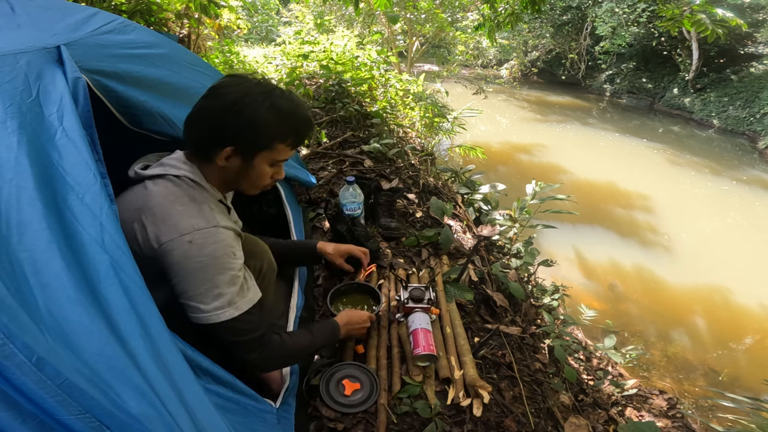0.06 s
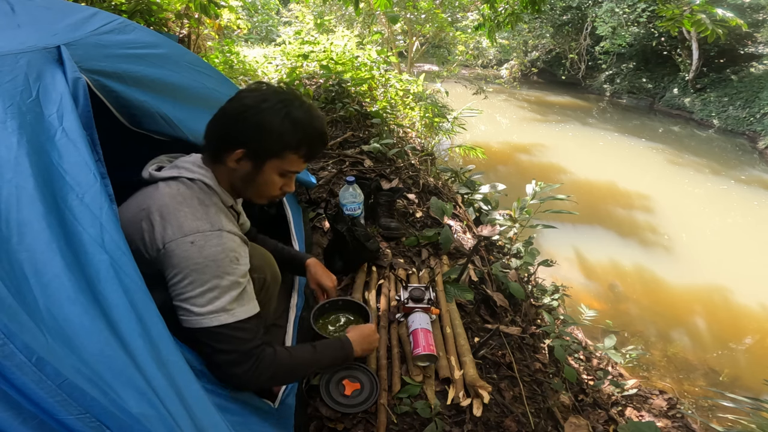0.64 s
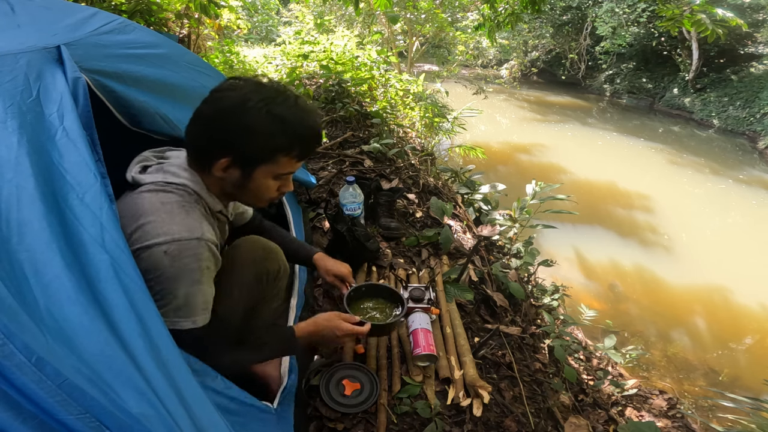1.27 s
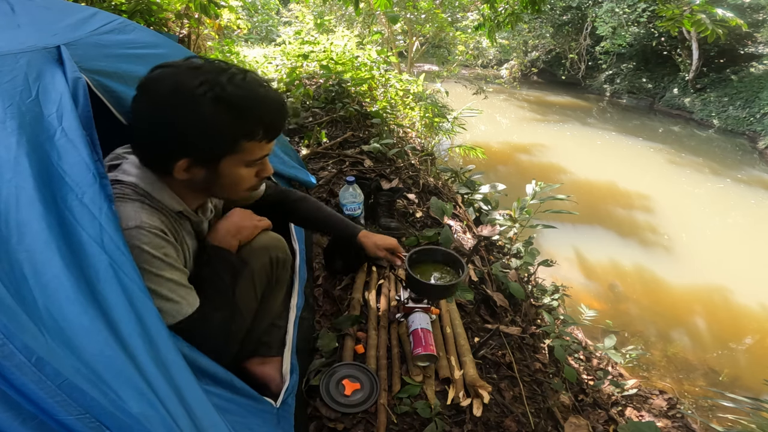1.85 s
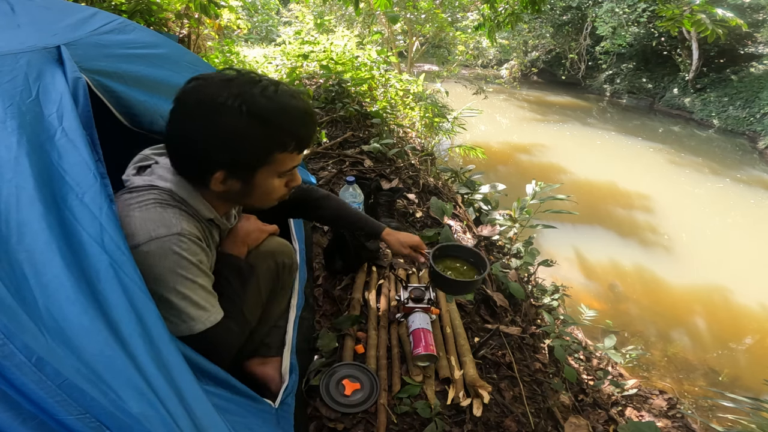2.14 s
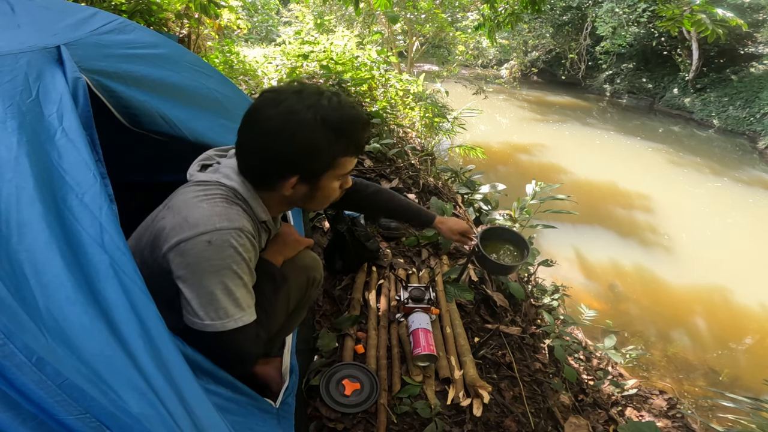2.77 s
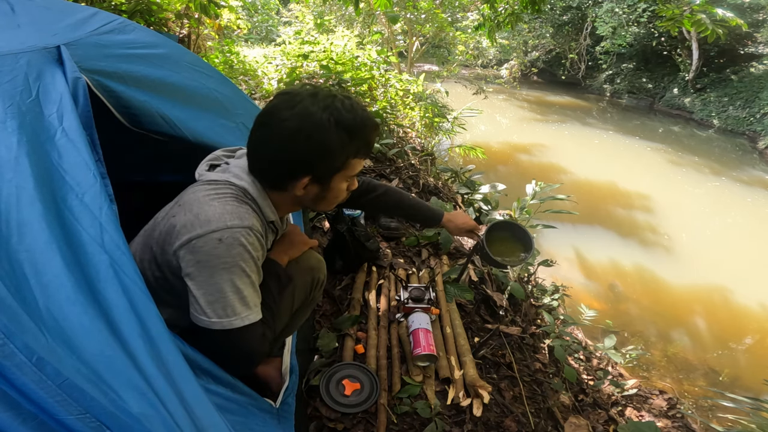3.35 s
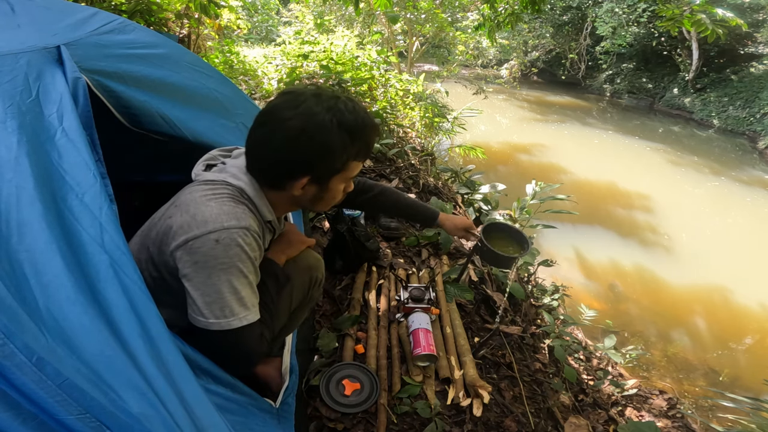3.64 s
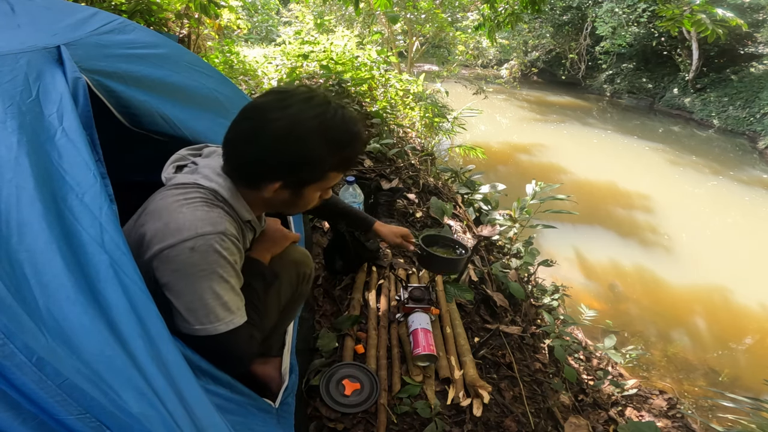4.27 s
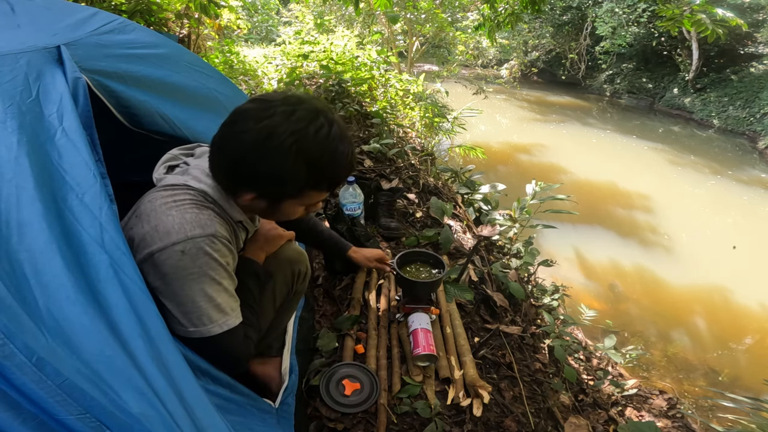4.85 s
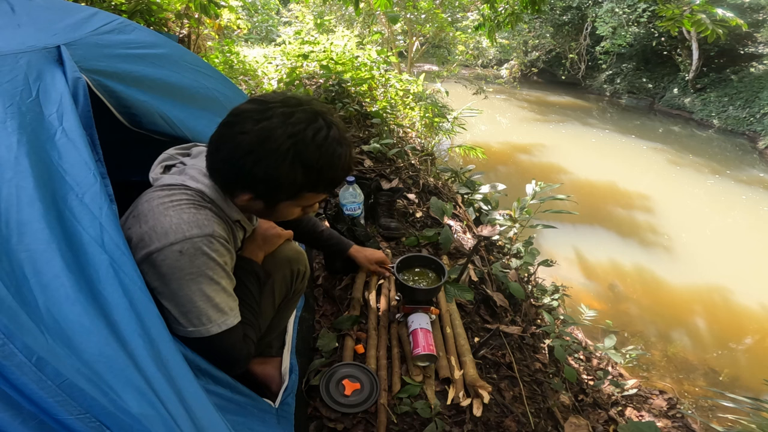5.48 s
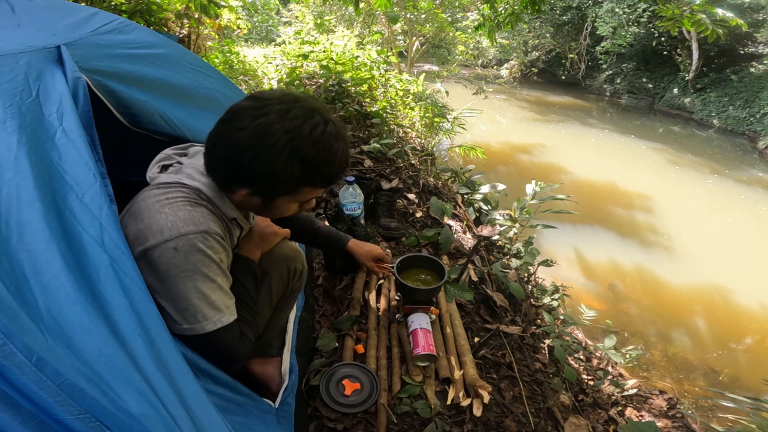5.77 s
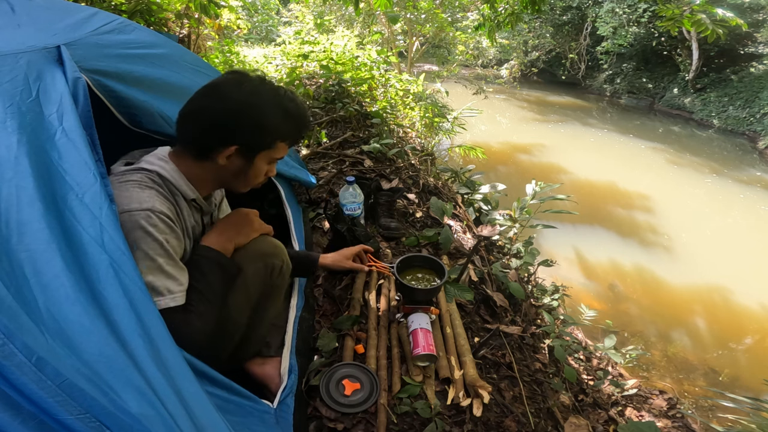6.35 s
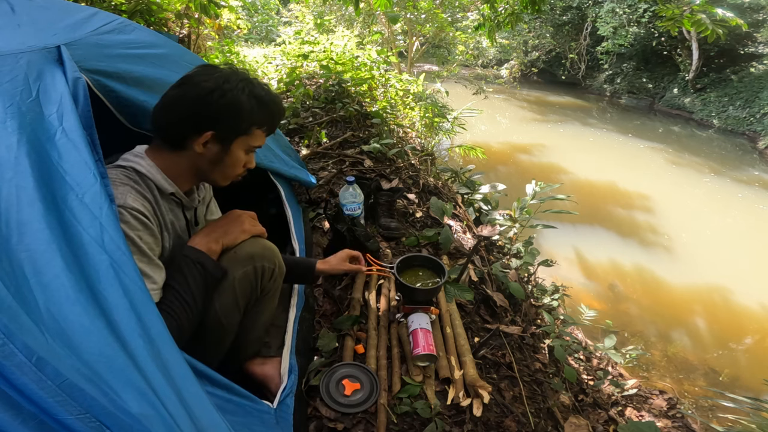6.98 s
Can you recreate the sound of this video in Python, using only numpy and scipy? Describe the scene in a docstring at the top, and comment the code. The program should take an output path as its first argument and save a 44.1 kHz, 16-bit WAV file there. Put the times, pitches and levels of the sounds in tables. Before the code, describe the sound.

Insects drone high and steady by a quiet forest river while a small pot knocks, spills a little water and is set down.

```python
"""On a forest river bank, cicadas drone by tymbal clicks, with trilling crickets and very high katydids. A
centred chorus crossfades into a wide one that leans to the left; the river murmurs underneath. A cook lifts a
small pot, tips water onto the leaves and sets the pot on a camp stove: each contact excites the pot's damped
modes, and each drop makes a short ping. Sleeves brush, and the handling shakes the microphone's stand into a
low rumble."""
import sys
import numpy as np
from scipy import signal
from scipy.fft import rfft, irfft, next_fast_len
from scipy.io import wavfile
from scipy.ndimage import map_coordinates

SR = 44100
rng = np.random.default_rng(int(sys.argv[2]) if len(sys.argv) > 2 else 0)


def log_audio(samples):
    """Write samples as a 16-bit WAV file to the path given in sys.argv[1]."""
    # one column per channel
    frames = np.atleast_2d(samples).T
    # limit to full scale, then quantise
    limited = np.clip(frames, -1, 1)
    pcm = np.round(limited * 32767).astype(np.int16)
    wavfile.write(sys.argv[1], SR, pcm)


N = 309582
TIME = np.arange(N) / SR  # [s]


def amp(db):
    """Decibels to amplitude ratio."""
    return 10 ** (np.asarray(db) / 20)

def unit(x):
    """Normalisation to rms 1."""
    return x / np.sqrt(np.mean(x ** 2) + 1e-30)

def noise():
    """Two uncorrelated white noises."""
    return rng.standard_normal((2, N))

def wobble(rate):
    """Random modulation: a smooth curve with rate knots a second."""
    return map_coordinates(rng.standard_normal(int(N * rate / SR) + 4), [TIME * rate])

def ramp(start, length):
    """Linear rise from 0 to 1."""
    return np.clip((TIME - start) / max(length, 1e-3), 0, 1)

def stroke(start, length, attack, release):
    """Trapezoidal envelope: attack, hold until the length is up, release."""
    return ramp(start, attack) * (1 - ramp(start + length, release))

def filtered(x, response):
    """Linear filtering: the spectrum of x times a frequency response."""
    size = next_fast_len(N + SR // 2)
    return irfft(rfft(x, size) * response(np.fft.rfftfreq(size, 1 / SR)), size)[..., :N]

def coloured(x, points):
    """Spectral shaping by (frequency [Hz], level [dB]) points, at rms 1."""
    hz, db = np.transpose(points)
    return unit(filtered(x, lambda f: amp(np.interp(np.log(f + 1), np.log(hz), db, -120, -120))))

def resonant(x, modes):
    """Steep-skirted resonances (frequency [Hz], bandwidth [Hz], level [dB]) driven by x, at rms 1."""
    def response(f):
        return sum(amp(db) * abs(f * width / (hz * hz - f * f + 1j * f * width)) ** 2
                   for hz, width, db in modes)
    return unit(filtered(x, response))

def placed(pair, left_db, width, lag=0):
    """Stereo image of a (shared, diffuse) pair by level difference; lag adds a phase difference."""
    shared, diffuse = pair
    left, right = amp(left_db / 2), amp(-left_db / 2)
    side = width * diffuse + lag * filtered(shared, lambda hz: -1j)
    norm = np.hypot(left + right, np.hypot(width, lag) * (left - right))
    return 2 * np.array([left * (shared + side), right * (shared - side)]) / norm

def forest(x, t60):
    """Multiple scattering among trunks and leaves: two uncorrelated, exponentially decaying tails."""
    t = np.arange(SR // 2) / SR
    tail = rng.standard_normal((2, len(t))) * amp(-60 * t / t60)
    return signal.fftconvolve(x[None], tail / np.linalg.norm(tail[0]), axes=1)[:, :N]

def nearby(x, left_db, wet_db):
    """Direct sound of a close source plus brief scattering off the bank."""
    return placed([x, 0 * x], left_db, width=0, lag=0.7) + amp(wet_db) * forest(x, t60=0.19)

def ambiences():
    """Crossfade gains: a centred ambience dies out while a wide one swells."""
    centred = (1 - ramp(start=0.69, length=0.87)) ** 2
    wide = 1 - np.exp(-np.maximum(TIME - 0.39, 0) / 2.8)
    return centred, wide

def presence(centred_db, wide_db):
    """Incoherent addition: the gain of a source with its own level in each ambience."""
    centred, wide = ambiences()
    return np.hypot(amp(centred_db) * centred, amp(wide_db) * wide)

def openness():
    """The wide ambience's share of the power: 0 centred, 1 wide."""
    centred, wide = ambiences()
    return wide ** 2 / (wide ** 2 + centred ** 2 + 1e-12)


# spectrum of the flowing water: (frequency [Hz], relative spectral level [dB])
RIVER_SPECTRUM = [(120, 1), (220, 5), (300, 8), (420, 1.5), (600, 0), (800, -6), (1100, -1.5), (1500, -1.5),
                  (2200, -3.5), (4500, -0.5), (8000, -13.5), (11000, -9), (15000, -3)]

def river():
    """Amplitude-modulated noise of a slow river; its gurgle opens to the right, its hiss to the left."""
    wash = coloured(noise(), RIVER_SPECTRUM) * amp(0.64 * wobble(3.27) + 1.6 * wobble(18))
    gurgle = filtered(wash, lambda hz: 1 / (1 + (hz / 750) ** 4))
    hiss = filtered(wash, lambda hz: 1 - 1 / (1 + (hz / 3600) ** 6))
    middle = wash - gurgle - hiss
    spread = openness()
    return (presence(-66.5, -66) * placed(gurgle, -5.5 * spread, 0.45 * spread, lag=0.93 * spread)
            + presence(-66.5, -68.5) * placed(middle, 0.37 * spread, 0.69 * spread, lag=0.46 * spread)
            + presence(-68.5, -69.5) * placed(hiss, 7 * spread, 0.6 * spread, lag=0.69 * spread))

def chirrup(start, hz, db):
    """One faint falling chirp, made hoarse by random frequency modulation."""
    t = np.clip(TIME - start, -0.2, 0.2)
    pitch = hz * np.exp(-1.6 * t + 0.079 * wobble(900))
    return amp(db) * np.exp(-(t / 0.032) ** 2) * np.sin(2 * np.pi * np.cumsum(pitch) / SR)

def swarm(click_rate, jitter, swell_db, count):
    """Superposed impulse trains: each insect clicks at its own unsteady rate, along its own path."""
    pair = np.zeros((2, N))
    for _ in range(count):
        rate = click_rate * np.exp(0.2 * rng.standard_normal() + 0.02 * wobble(5) + jitter * wobble(150))
        clicks = np.diff(np.floor(np.cumsum(rate) / SR), prepend=0)
        pair += forest(clicks * amp(swell_db * wobble(12)), t60=0.083)
    return pair

def chirps(offset_s, sigma_s):
    """Periodic Gaussian envelopes that fade out as the steady buzz takes over."""
    first_s, period_s = 0.35, 0.402
    from_peak = (TIME - first_s - offset_s + period_s / 2) % period_s - period_s / 2
    return np.exp(-0.5 * (from_peak / sigma_s) ** 2) * np.interp(TIME, [3.8, 4.3], [1, 0])


# katydids that buzz on once started: (start [s], rise [s], frequency [Hz], bandwidth [Hz], level [dB])
STEADY_KATYDIDS = [(3.45, 0.15, 13700, 430, -70), (4.15, 0.42, 12880, 685, -66)]

def katydids():
    """Stridulation: wing files drive resonances at the top of hearing, in chirps or without a break."""
    def rasp(hz, width):
        return resonant(swarm(click_rate=300, jitter=0.25, swell_db=1.7, count=4), [(hz, width, 0)])
    far = amp(-75) * rasp(12600, 1100) + amp(-80.5) * rasp(14050, 700)
    buzz = sum(amp(db) * ramp(start, rise_s) * rasp(hz, width)
               for start, rise_s, hz, width, db in STEADY_KATYDIDS)
    # each chirp climbs to a bright top, then sinks back
    rise = amp(-76) * chirps(offset_s=-0.05, sigma_s=0.029) * rasp(13050, 950)
    top = amp(-69.5) * chirps(offset_s=0, sigma_s=0.061) * rasp(13600, 900)
    fall = amp(-70.5) * chirps(offset_s=0.13, sigma_s=0.054) * rasp(12800, 850)
    return placed(far + buzz + rise + fall, left_db=8.5, width=0.82) + placed(top, left_db=4.5, width=1)

def singers(rows):
    """Narrow-band noise: one wavering tone for each near insect."""
    return sum(amp(db) * resonant(noise(), [(hz, width, 0)]) for hz, width, db in rows)


# cricket tones: (frequency [Hz], bandwidth [Hz], relative level [dB])
CRICKET_TONES = [(5564, 81, -25), (5738, 61, -22), (5986, 89, -21.5)]

def crickets():
    """Sharp resonance: crickets trill in narrow bands between the two cicada choruses."""
    spread = openness()
    trill = placed(singers(CRICKET_TONES), 9 * spread, 0.76 * spread, lag=0.49 * spread)
    return presence(centred_db=-50, wide_db=-56) * trill


# song spectra of the two kinds of cicada: (frequency [Hz], relative spectral level [dB])
SHRILL_SPECTRUM = [(4000, -49), (5300, -28.5), (6100, -23), (6500, -15), (6750, -8.5), (6970, 0),
                   (7300, -2.5), (7800, -5.5), (8150, -12.5), (8450, -7), (8750, -16), (9100, -25),
                   (10500, -33), (12000, -71)]
LOW_SPECTRUM = [(2400, -28), (2850, -19.5), (3020, -9.5), (3160, -1), (3360, -2), (3580, -4), (3750, -11.5),
                (4200, -21.5), (5200, -27)]
# single cicadas that stand out: (frequency [Hz], bandwidth [Hz], level re their chorus [dB])
SHRILL_SOLOISTS = [(6920, 22, -19.5), (7300, 29, -20), (8000, 39, -16.5), (8170, 40, -18),
                   (8830, 57, -26.5)]
LOW_SOLOISTS = [(3332, 77, -8), (3579, 25, -8.5), (3920, 31, -20.5), (4150, 25, -26)]

def cicadas():
    """Cavity resonance: tymbal clicks ring in the hollow bodies of two kinds of cicada."""
    shrill = coloured(swarm(click_rate=420, jitter=0.15, swell_db=0.9, count=10), SHRILL_SPECTRUM)
    shrill += singers(SHRILL_SOLOISTS)
    low = coloured(swarm(click_rate=260, jitter=0.15, swell_db=2, count=7), LOW_SPECTRUM)
    low += singers(LOW_SOLOISTS)
    # the low chorus throbs at first, then steps up and keeps growing as nearer cicadas join
    spread, join_s = openness(), 3.5
    throb_db = 2.4 * (1 - spread) * chirps(offset_s=-0.03, sigma_s=0.079)
    growth_db = ramp(join_s, 0.061) * (5 + 0.46 * (TIME - join_s))
    low *= amp(throb_db + growth_db)
    return (presence(-52, -54) * placed(shrill, 15.4 * spread, 0.82 * spread)
            + presence(-66, -68.5) * placed(low, 4.5 * spread, 0.38 * spread, lag=0.75 * spread))

def swing(start, hz, swell_s):
    """Transient vibration of one mode: it builds up for swell_s, then dies away."""
    t = np.maximum(TIME - start, 0)
    return (t / swell_s * np.exp(1 - t / swell_s)) ** 2 * np.sin(2 * np.pi * hz * t)


# the stand's deep and upper resonances: (frequency [Hz], bandwidth [Hz], relative level [dB])
SWAY_MODES = [(23.8, 17, -3), (42, 9.8, 0), (58.5, 17, -12), (96.5, 9.3, -19.5), (117.1, 4.3, -10.5)]
BOOM_MODES = [(157, 37.6, 3), (198, 40, -4), (225, 72, -21.5)]
# the cook shifts his weight: (start [s], duration [s], sway level [dB], boom level [dB])
WEIGHT_SHIFTS = [(2.42, 0.43, -58, -73.5), (3.6, 0.444, -50, -71.5), (5.075, 0.657, -47.5, -60.5),
                 (5.8, 0.54, -59, -68)]
# soft bumps on the stand: (time [s], level [dB])
STAND_BUMPS = [(3.619, -43.5), (4.01, -46), (4.698, -33), (4.841, -42), (5.339, -36.5), (5.66, -43)]
# the stand's swing after a bump: (frequency [Hz], relative level [dB], rise [s])
SWING_MODES = [(42.2, 1, 0.044), (116.2, -14, 0.044)]
# dull thuds of the stick platform: (time [s], level [dB], frequency [Hz])
PLATFORM_THUDS = [(3.585, -55.5, 194), (4.346, -51.5, 230), (4.668, -45.5, 178), (5.01, -64.5, 300),
                  (5.596, -45, 165), (6.409, -61.5, 291)]

def stand():
    """Structure-borne vibration: movement shakes the stand, bumps swing it and the platform thuds."""
    sway_gain, boom_gain = presence(-52.5, -57.5), presence(-66, -66)
    for start, length, sway_db, boom_db in WEIGHT_SHIFTS:
        move = stroke(start, length, attack=0.042, release=0.083)
        sway_gain = np.hypot(sway_gain, amp(sway_db) * move)
        boom_gain = np.hypot(boom_gain, amp(boom_db) * move)
    sway = sway_gain * amp(1.17 * wobble(7.5)) * resonant(noise(), SWAY_MODES)
    hum = np.sin(2 * np.pi * np.cumsum(191 + 6 * wobble(25.17)) / SR)
    hum = hum + 0.5 * resonant(noise(), [(168, 39, 0)])
    boom = boom_gain * resonant(noise(), BOOM_MODES) * amp(2.8 * wobble(14))
    centred, _ = ambiences()
    boom += amp(-58) * centred * hum  # a low hum fades with the centred ambience
    sway[0] += sum(amp(db + mode_db) * swing(start, hz, swell_s)
                   for start, db in STAND_BUMPS for hz, mode_db, swell_s in SWING_MODES)
    boom[0] += sum(amp(db) * swing(start, hz, swell_s=0.015) for start, db, hz in PLATFORM_THUDS)
    boom *= amp(1.2 * wobble(90))  # the joints rattle, so the thuds are never pure tones
    spread = openness()
    return placed(sway, -4.2 * spread, 0.27 * spread) + placed(boom, -5.5 * spread, 0.59 * spread)


# spectrum of rubbing cloth: (frequency [Hz], relative spectral level [dB])
CLOTH_SPECTRUM = [(600, -28), (1000, -2.5), (1300, 0.5), (2000, -3.5), (3000, -5.5), (6000, -13),
                  (10000, -34)]
# brushes as the arm and body move: (start [s], duration [s], level [dB])
SLEEVE_BRUSHES = [(.72, 0.43, -77), (1.119, .36, -69.5), (1.503, 0.13, -71), (1.818, 0.86, -78.5),
                  (5.98, 0.82, -75)]

def clothes():
    """Friction noise: sleeves brush softly against the body."""
    rubbing = sum(amp(db) * stroke(start, length, attack=0.13, release=0.091)
                  for start, length, db in SLEEVE_BRUSHES)
    rubbing *= amp(1.4 * wobble(40))
    return rubbing * placed(coloured(noise(), CLOTH_SPECTRUM), left_db=3, width=0.27, lag=0.48)


# modes of the hand-damped pot: (frequency [Hz], relative level [dB], 60 dB decay time [s])
POT_MODES = [(470, -9.5, 0.086), (1086, 2, 0.029), (1400, 2.5, 0.041), (1538, 4.5, 0.03), (1800, 3, 0.028),
             (2230, -16, 0.088)]
# the pot against stove and sticks: (time [s], level [dB])
POT_KNOCKS = [(1.5937, -56), (1.9958, -60), (2.2867, -62), (3.553, -53.5), (4.663, -46), (5.0796, -52),
              (5.131, -60), (5.257, -62), (5.3376, -64), (5.589, -51.5)]

def pot():
    """Impact excites damped modes and a dull crack; friction sounds as the pot slides on the stove."""
    knocks, t = np.zeros(N + SR), np.arange(SR // 4) / SR
    crack_band = signal.butter(2, [450, 2300], "band", fs=SR)
    onset = 1 - np.exp(-t / 0.002)  # the hand softens the contact
    for start, db in POT_KNOCKS:
        ring = sum(amp(mode_db + rng.normal(0, 3.3) - 60 * t / t60)
                   * np.sin(2 * np.pi * (hz * t + rng.random())) for hz, mode_db, t60 in POT_MODES)
        crack = 7 * signal.lfilter(*crack_band, rng.standard_normal(len(t))) * amp(-60 * t / 0.025)
        knocks[round(start * SR):][:len(t)] += amp(db - 8.5) * onset * (ring + crack)
    slide = stroke(start=5.11, length=0.23, attack=0.022, release=0.04) * amp(-75 + 2.7 * wobble(60))
    scrape = slide * resonant(noise(), [(1540, 240, 0)])[0]
    return nearby(knocks[:N] + scrape, left_db=-0.5, wet_db=-7.5)

def splats(rows):
    """Damped sinusoids: each drop decays as a short ping."""
    pings, t = np.zeros(N + SR), np.arange(SR // 16) / SR
    for start, size, hz, t60 in rows:
        pings[round(start * SR):][:len(t)] += size * np.sin(2 * np.pi * hz * t) * amp(-60 * t / t60)
    return pings[:N]

def gush(start, length, median_hz):
    """Shot noise: a dense patter of tiny splashes scattered around one pitch, fading at the end."""
    scatter_octaves, size_range_db, decay_cycles, release_s = 0.27, 21, 14.5, 0.2
    when, size, rank = rng.random(size=(400, 3)).T
    span = length + release_s
    octaves = scatter_octaves * np.log(rank / (1 - rank))  # logistic distribution
    hz = np.clip(median_hz * 2 ** octaves, 1200, 12000)
    # higher splashes die sooner, so they must be stronger to carry the same energy
    strength = amp(size_range_db * size) * np.sqrt(hz)
    patter = splats(zip(start + when * span, strength, hz, decay_cycles / hz))
    return unit(patter) * np.sqrt(span * SR / N) * stroke(start, length, attack=0.022, release=release_s)


# a dull slop, then a bright spatter: (start [s], duration [s], level [dB], median frequency [Hz])
WATER_GUSHES = [(3.569, .04, -65, 2960), (3.669, .19, -65.5, 4000)]
# single large drops: (time [s], level [dB], frequency [Hz], 60 dB decay time [s])
LARGE_DROPS = [(3.609, -43.5, 3460, 0.0037), (3.658, -40, 4260, 0.004), (3.847, -46, 3720, 0.0076),
               (3.882, -37.5, 12300, 0.003), (3.934, -43, 2230, 0.011), (4.090, -44, 2930, 0.016),
               (4.107, -43, 2930, 0.0065)]

def pouring():
    """Drop impact: water patters on leaves in gushes, and the biggest drops land one by one."""
    patter = sum(amp(db) * gush(start, length, hz) for start, length, db, hz in WATER_GUSHES)
    drops = splats((start, amp(db), hz, t60) for start, db, hz, t60 in LARGE_DROPS)
    return nearby(patter, left_db=1.5, wet_db=-8) + nearby(drops, left_db=1, wet_db=-4.5)

def scene():
    """Superposition: insects and river all around, the cook close by."""
    surroundings = cicadas() + crickets() + katydids() + river()
    cook = stand() + pot() + pouring() + clothes()
    return surroundings + cook + chirrup(start=2.465, hz=1880, db=-69)

def record(dry):
    """Band limiting: an ideal low-pass filter at 15.5 kHz."""
    return filtered(dry, lambda hz: hz < 15500)


dry = scene()
out = record(dry)
log_audio(out)
```